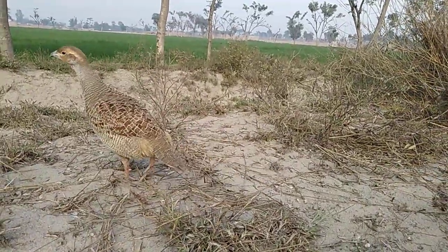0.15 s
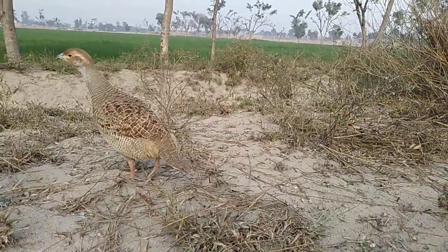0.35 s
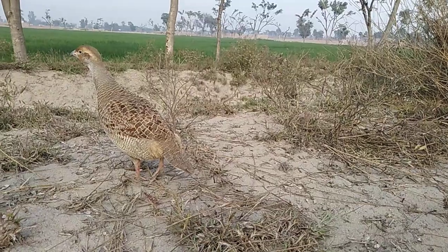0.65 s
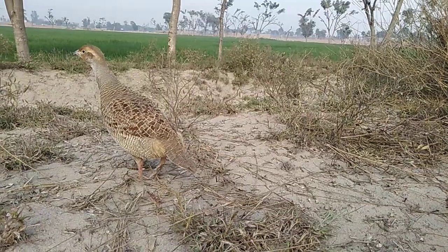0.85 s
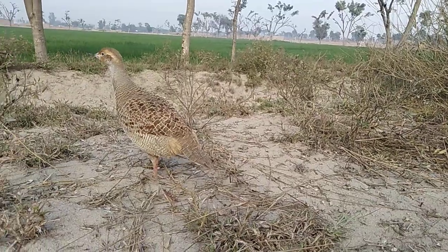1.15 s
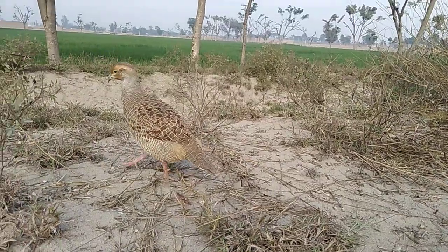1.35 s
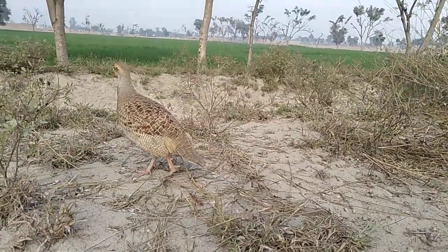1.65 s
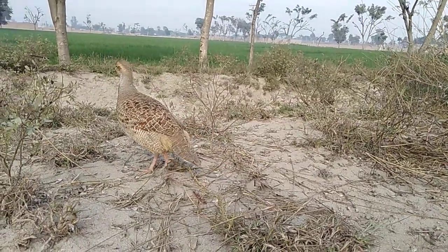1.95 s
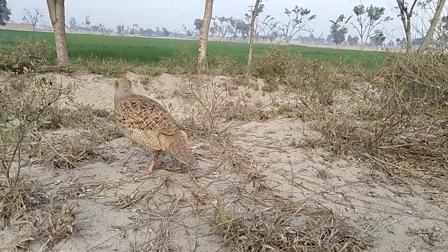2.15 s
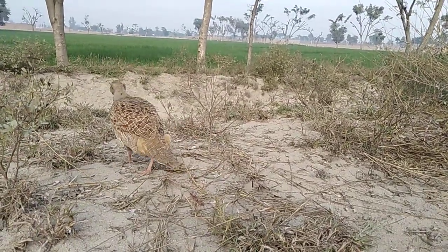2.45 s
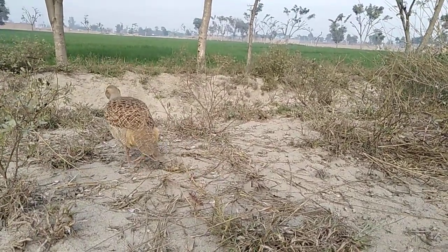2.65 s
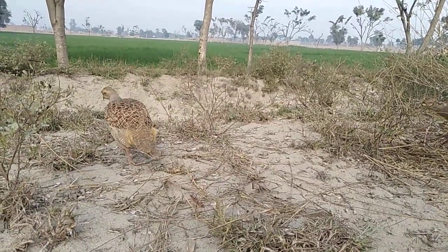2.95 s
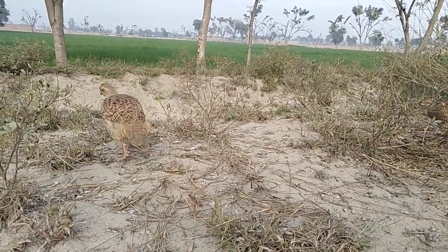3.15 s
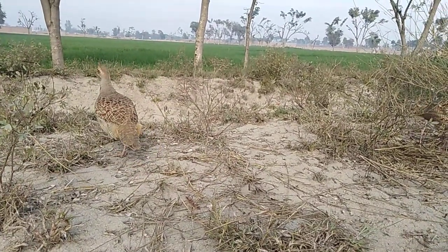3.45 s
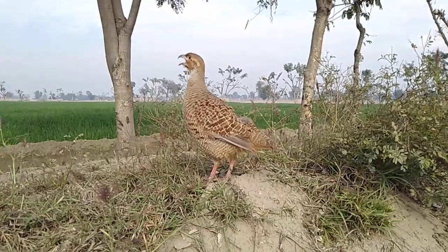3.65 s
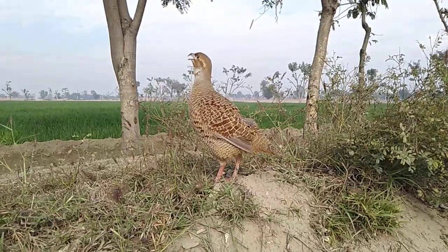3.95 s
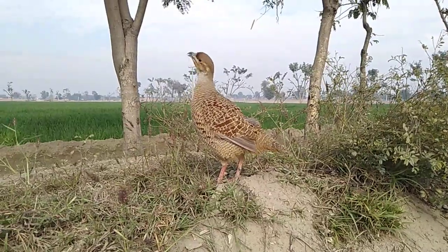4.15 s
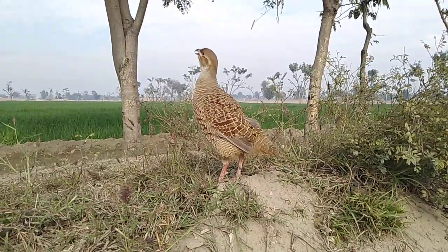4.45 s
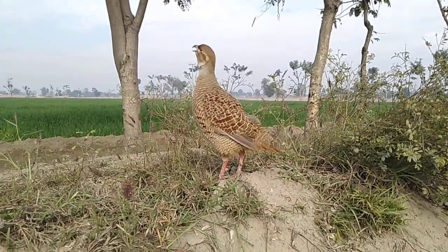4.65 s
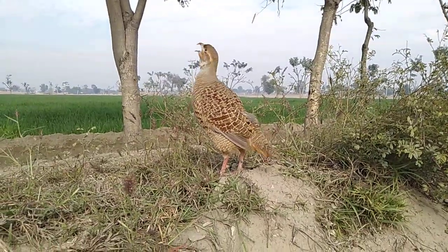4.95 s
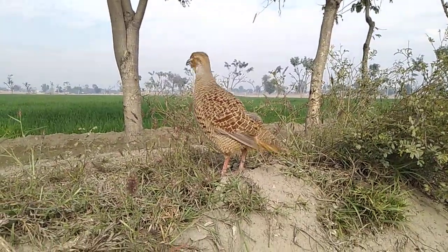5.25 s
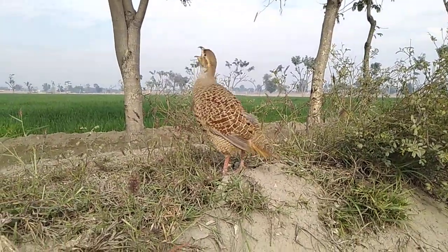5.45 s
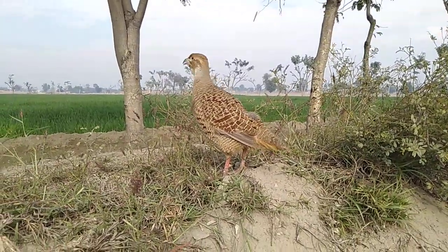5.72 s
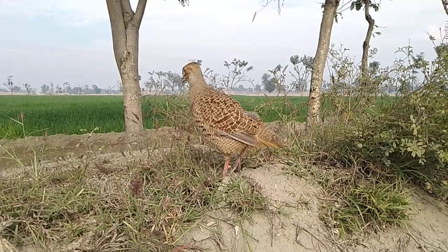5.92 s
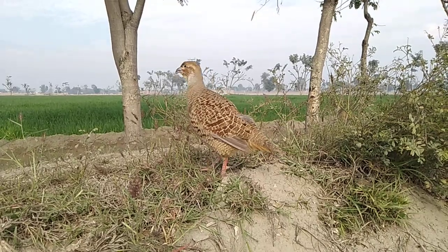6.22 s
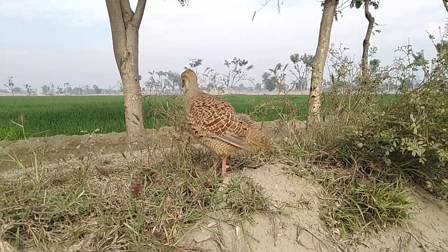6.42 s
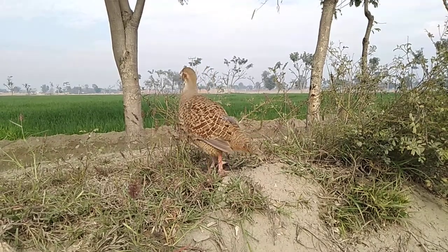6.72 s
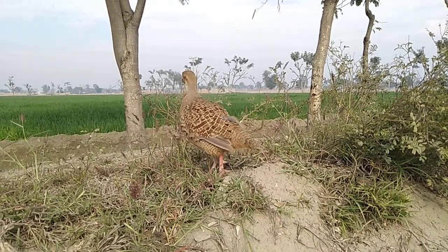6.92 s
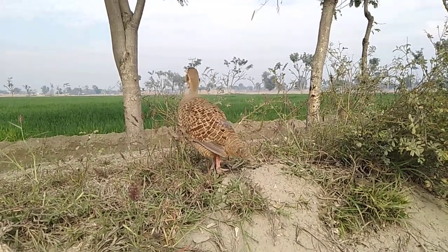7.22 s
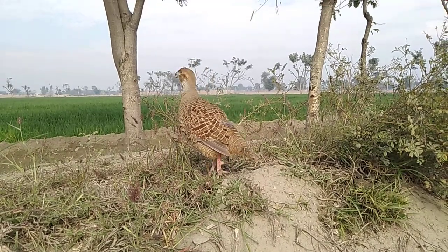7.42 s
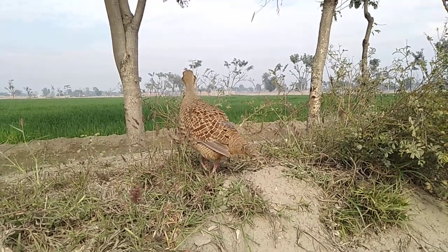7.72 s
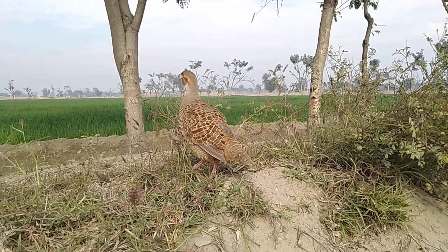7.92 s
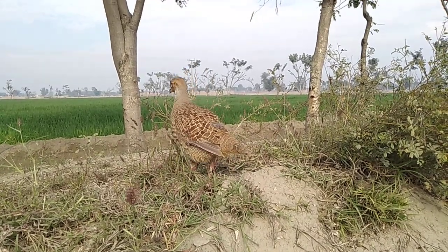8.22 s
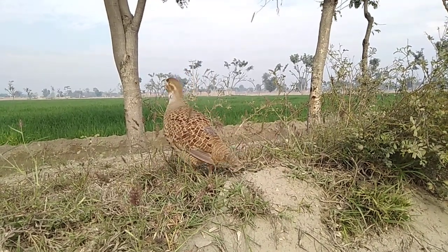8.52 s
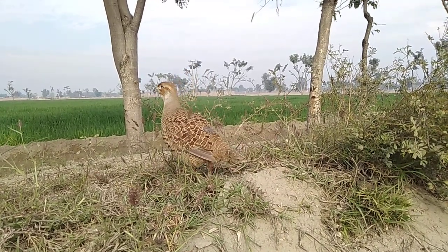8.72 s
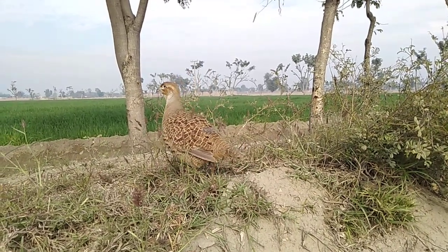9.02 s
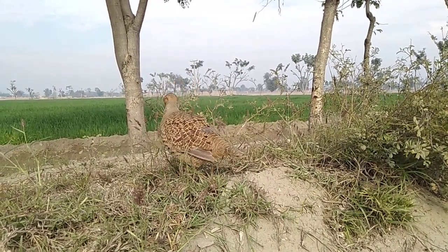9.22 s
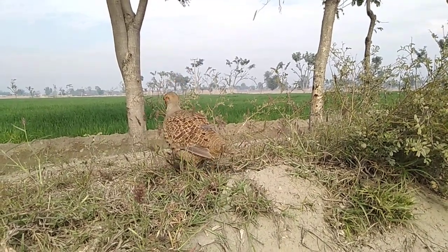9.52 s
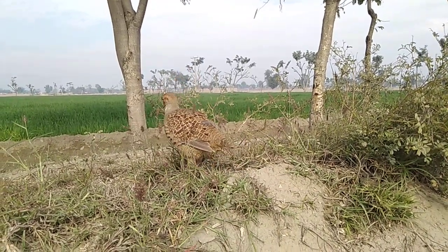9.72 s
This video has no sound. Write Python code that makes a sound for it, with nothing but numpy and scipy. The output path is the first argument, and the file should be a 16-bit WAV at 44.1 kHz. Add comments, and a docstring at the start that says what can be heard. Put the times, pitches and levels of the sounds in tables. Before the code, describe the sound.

A francolin calls close to the microphone at the edge of a field. It begins with three sharp, separate chips. After a short pause it gives nine quick, loud phrases, each made of clucks, a high whistle and a raspy yelp that slurs downward, and ends in fading clucks. Beneath are a quiet distant hum, a faint hiss, a few tiny grass ticks and very faint far birds.

```python
"""At the edge of a field, a grey francolin calls close by: three sharp chips, then a run of nine
phrases (two clucks, a whistle, a rasping yelp, a falling slur) that ends in fading clucks.
Its syrinx flips between clean tone and chaotic rasp; in clucks and chips its pulses ring the throat.
Ground and bushes scatter the calls; dry grass ticks and far birds call faintly over a low distant hum."""
import sys
import numpy as np
from scipy import signal
from scipy.fft import rfft, irfft, next_fast_len
from scipy.io import wavfile
from scipy.ndimage import uniform_filter1d, minimum_filter1d, map_coordinates

SR = 44100
rng = np.random.default_rng(int(sys.argv[2]) if len(sys.argv) > 2 else 0)


def unload_audio(sound):
    """Save the sound as a 16-bit wav file, at the path given as the first command line argument."""
    columns = np.transpose(np.atleast_2d(sound))
    # keep every value between -1 and 1, then stretch to whole-number steps
    steps = np.round(np.clip(columns, -1, 1) * 32767)
    wavfile.write(sys.argv[1], SR, steps.astype(np.int16))


N = 435266
TOP_HZ = 15900  # band limit
SLACK_HZ = 1052  # pitch of the slack syrinx, where squeaks start and held notes collapse

# Held notes: the tone scoops up from entry_hz, holds and sags, then collapses. Rasp is strong at the
# catch, faint in the hold (rasp_db), strong at the break, and fades over the release.
WHISTLE = dict(hz=2554, entry_hz=2091, sag_hz=0, db=-22.5, entry_db=-1, sag_db=.5,
               attack_s=.012, hold_s=.076, release_s=.02, collapse_s=.013,
               catch_db=-27, rasp_db=-52.5, break_db=-28.5, fade_db=28)
YELP = dict(hz=2619, entry_hz=2097, sag_hz=25, db=-16, entry_db=-6.5, sag_db=2.5,
            attack_s=.012, hold_s=.015, release_s=.039, collapse_s=.011,
            catch_db=-25.5, rasp_db=-40.5, break_db=-29.5, fade_db=8.5)
SLUR = dict(hz=1965, entry_hz=1760, sag_hz=324, db=-14.5, entry_db=-13.5, sag_db=4,
            attack_s=.0041, hold_s=.037, release_s=.017, collapse_s=.018,
            catch_db=-27, rasp_db=-50, break_db=-39, fade_db=16.5)
SLUR_LAG_S = .049  # from yelp to slur
# Base colour of each note, harmonics 2 and up: (level against the fundamental [dB])
WHISTLE_OVERTONES = [-6.5, -35.5, -26, -11, -6.5]
YELP_OVERTONES = [-5, -20.5, -32.5, -43.5, -34.5]
SLUR_OVERTONES = [-20, -25.5, -36.5, -42.5]
# Cues for the run: (whistle time [s], whistle gain [dB], yelp time [s], slur stretch [ratio])
PHRASES = [(3.676, -1.5, 3.815, 0.83), (4.219, -1, 4.377, .92), (4.78, -1, 4.935, 1.03),
           (5.345, 0, 5.497, 1.05), (5.932, 1, 6.108, 1.1), (6.526, 1.5, 6.684, 1.08),
           (7.111, 0.5, 7.287, 1.07), (7.719, 1.5, 7.912, .8), (8.329, 0.5, 8.533, .75)]


def phrases():
    """A rasping squeak leads into both whistle and yelp; the whistle lengthens along the run."""
    out = np.zeros(N)
    stretches = np.linspace(.96, 1.05, len(PHRASES))
    for (whistle_s, whistle_db, yelp_s, slur_stretch), stretch in zip(PHRASES, stretches):
        # a harder whistle has stronger top overtones
        overtones = WHISTLE_OVERTONES + .5 * (whistle_db - 4) * np.arange(len(WHISTLE_OVERTONES))
        add(out, *squeak(whistle_s, stretch=.85, db=-8.5))
        add(out, *held_note(whistle_s + .00047, WHISTLE, overtones, jitter=.038, split_db=-27.5,
                            stretch=stretch, db=whistle_db))
        add(out, *squeak(yelp_s, stretch=.95, db=.5))
        add(out, *held_note(yelp_s + .0011, YELP, YELP_OVERTONES, jitter=.1, split_db=-41.5))
        add(out, *held_note(yelp_s + SLUR_LAG_S, SLUR, SLUR_OVERTONES, jitter=.064, split_db=-44,
                            stretch=slur_stretch))
    return out


def held_note(s, kind, overtones, jitter, split_db, stretch=1, db=0):
    """A tone locks out of rasp at s, holds, and breaks back into rasp; returns (start [s], sound)."""
    lock_s, break_s = .0027, .0017
    attack, hold, release = kind["attack_s"], kind["hold_s"], kind["release_s"]
    t = np.arange(-attack, hold + release, 1 / (SR * stretch))
    loose, sag = ramp(-t, lock_s), ramp(t, hold)
    broken, dying = ramp(t - hold, break_s), ramp(t - hold, release)
    hz = kind["hz"] - kind["sag_hz"] * sag
    hz = hz + (kind["entry_hz"] - hz) * loose + (SLACK_HZ - hz) * ramp(t - hold, kind["collapse_s"])
    onset_db = db - 25 * ramp(-t, attack) ** 4
    tone_db = kind["db"] + kind["entry_db"] * loose - kind["sag_db"] * sag - 3 * broken - 28 * dying
    rasp_db = kind["rasp_db"] * (1 - loose - broken)
    rasp_db += kind["catch_db"] * loose + kind["break_db"] * broken
    rasp_db -= kind["fade_db"] * ramp(t - hold - break_s, release - break_s)
    edge_db = .5 - 11 * loose - 5 * broken  # overtones are strongest while locked
    sound = syrinx(hz, onset_db + tone_db, edge_db, onset_db + rasp_db, overtones, jitter, split_db)
    return s - attack * stretch, sound


# Base colour of the squeak, harmonics 2 and up: (level against the fundamental [dB])
SQUEAK_OVERTONES = [0.98, 0.39, -18.5]


def squeak(s, stretch, db):
    """Pitch arches up with tension and drops to a growl that ends at s; returns (start [s], sound)."""
    length_s, arch_s, top_hz = .053, .026, 1958
    t = np.arange(-.008, length_s + .004, 1 / (SR * stretch))
    tension = 1 - ramp(abs(2 * t - arch_s), arch_s) ** 3
    level_db = db + envelope(t, .0014, length_s - .006, attack_s=.011, release_s=.0083, sag_db=2)
    hz = (SLACK_HZ + (top_hz - SLACK_HZ) * tension) * (1 + .02 * wobble(len(t), 70))
    tone_db = level_db - 28.5 + 1.5 * tension
    edge_db = 5 * tension - 5.5
    rasp_db = level_db - 26 - 7 * tension ** 6  # the rasp clears at the top
    sound = syrinx(hz, tone_db, edge_db, rasp_db, SQUEAK_OVERTONES, jitter=.068)
    return s + (t[0] - length_s) * stretch, sound


# EQ of the rasp: (frequency [Hz], gain [dB])
RASP_EQ = [(300, -39.5), (700, -38), (1050, -3.5), (1450, -8.5), (2100, 2.5), (3100, 5), (4200, -11.5),
           (5300, 0), (6700, -10.5), (8300, -8.5), (11000, -23.5), (14500, -16), (16000, -24.5)]


def syrinx(hz, tone_db, edge_db, rasp_db, overtones, jitter, split_db=-44):
    """One gesture of the syrinx, which flips between a clean tone and a chaotic rasp."""
    size = len(hz)
    chaos = 1 / (1 + amp(tone_db - rasp_db) ** 2)  # the rasp's share of the power
    drift = .0034 * wobble(size, 30)
    shake = .03 * wobble(size, 150) + jitter * wobble(size, 1500)
    phase = turning(hz * (1 + drift + chaos * shake))
    voiced = tone(phase, overtones, amp(edge_db + .21 * wobble(size, 27)))
    rasp = noise(size, RASP_EQ) * (1 + .27 * np.cos(phase / 2))
    rasp *= amp(3.1 * wobble(size, 500))  # air escapes in uneven spurts
    # alternate cycles differ slightly: weak lines halfway between the harmonics
    halves = amp(split_db) * sum(wobble(size, 40) * np.sin((k + .5) * phase) for k in range(4))
    return amp(wobble(size, 90)) * (amp(tone_db) * (voiced + halves) + amp(rasp_db) * rasp)


# Cues for the clucks: (time [s], clucks [count], first level [dB], step per cluck [dB])
CLUCK_BOUTS = [(0.891, 1, -51.5, 0), (3.643, 1, -28.5, 0), (4.0, 2, -20, 0), (4.57, 2, -19.5, 0),
               (5.135, 2, -18.5, -1.5), (5.7, 2, -20, 0.1), (5.914, 1, -26.5, 0), (6.314, 2, -19, -2),
               (6.893, 2, -21.5, -1), (7.496, 2, -22, -0.4), (8.106, 2, -21, -1.85), (8.729, 3, -22, -6.5),
               (9.059, 1, -56, 0)]


def clucks(gap_s=.105):
    """Bouts of evenly spaced clucks, mostly a pair before each phrase."""
    out = np.zeros(N)
    for s, count, db, step_db in CLUCK_BOUTS:
        for k in range(count):
            add(out, s + k * gap_s, cluck(db + k * step_db))
    return out


# Throat resonances of a cluck: (centre [Hz], width [Hz], gain [dB])
CLUCK_THROAT = [(1390, 432, 28.5), (3030, 810, -28), (5900, 760, -33)]
# Base colour of its pure ending, harmonics 2 and up: (level against the fundamental [dB])
CLUCK_OVERTONES = [-22, -39.5, -27.5]


def cluck(db):
    """A rough buzz swells until the syrinx locks onto the throat resonance as a falling pure tone."""
    low_hz, arch_hz = 306.6, 188.1  # pulse rate at the ends, and its rise in the middle
    end_hz, sag_hz_per_s = 1350, 7000  # the pure tone
    length_s = .055 * amp(.2 * (db + 21))  # softer clucks are shorter
    pure_s = .027 * ramp(db + 23, 3)  # only a forceful cluck ends in a pure tone
    t = np.arange(int(1.2 * length_s * SR)) / SR
    size = len(t)
    swell_db = .5 + envelope(t, .35 * length_s, .95 * length_s, attack_s=.026, release_s=.016, sag_db=6)
    hz = low_hz + arch_hz * np.sin(np.pi * t / t[-1])
    hz *= 1 + .035 * wobble(size, 80) + .05 * wobble(size, 700)
    gate = np.minimum(ramp(t - length_s + pure_s, .002), ramp(length_s + .003 - t, .006))
    locked = np.sin(np.pi / 2 * gate) ** 2 * ramp(pure_s, .0087)  # a brief lock stays weak
    rough = (1 - .7 * locked) * (buzz(hz, CLUCK_THROAT, order=20) + amp(-21) * noise(size, RASP_EQ))
    pure_hz = end_hz + sag_hz_per_s * (length_s - t)
    pure_hz *= 1 + .012 * wobble(size, 48) + .0072 * wobble(size, 1300)
    clean = tone(turning(pure_hz), CLUCK_OVERTONES, amp(-4 + 4.6 * wobble(size, 88)))
    return amp(db) * (amp(swell_db) * rough + amp(2.5) * locked * clean)


def clipped_cluck(hz=1170):
    """The tail of a cluck cuts in abruptly and rings briefly."""
    t = np.arange(SR // 25) / SR
    return amp(-16.5) * np.cos(2 * np.pi * hz * t) / (1 + (t / .0098) ** 4)


# Beak resonances of a chip: (centre [Hz], width [Hz], gain [dB])
CHIP_BEAK = [(590, 810, -29.5), (1394, 400, -16.5), (4500, 430, -16.5), (6740, 1100, -20.5)]
# Cues for the chips: (time [s], level [dB], onset snap gain [dB])
CHIPS = [(0.93, -16.5, -3.5), (1.508, -16.5, -13), (2.122, -17.5, -0.5)]


def chips():
    """Sharp single notes: pulse rate arches while the throat resonance falls and the treble darkens."""
    out = np.zeros(N)
    full_s, end_s, release_s = .015, .058, .042
    t = np.arange(int((end_s + release_s) * SR)) / SR
    rate_hz = arch(t, top=645, at_s=.04, width_s=.06)
    throat_hz = arch(t, top=2280, at_s=.013, width_s=.087)
    crack = arch(t, top=.52, at_s=.042, width_s=.0059)  # the voice cracks at its highest
    level_db = envelope(t, full_s, end_s, attack_s=.024, release_s=release_s, sag_db=3) - 5 * crack
    dark_db = 7 * ramp(t - end_s, release_s)
    beak = [(centre, width, db - dark_db * (centre > throat_hz)) for centre, width, db in CHIP_BEAK]
    hiss_eq = [(1000, -13.5), (5700, -10.5), (6600, 0), (8500, -1.5), (11000, -19)]
    for s, db, snap_db in CHIPS:
        hz = rate_hz * (1 + .026 * wobble(len(t), 60) + .2 * (.15 + crack) * wobble(len(t), 900))
        voice = buzz(hz, [(throat_hz, 680, 0)] + beak)
        growl = amp(level_db / 2 - 22.5) * np.sin(turning(hz))  # the fundamental outlasts the overtones
        hiss = amp(level_db / 2 - 28.5 - dark_db) * noise(len(t), hiss_eq)
        snap = amp(snap_db - 8 - 60 * t / .07) * buzz(hz, [(6900, 1700, 7.5), (12400, 5500, -21.5)])
        add(out, s, amp(db) * (amp(level_db) * voice + growl + hiss + snap))
    return out


def buzz(hz, throat, order=36):
    """Syrinx pulses ringing the throat's steep resonances, at a steady rms of 1."""
    k = np.arange(1, order + 1)[:, None]
    f = k * uniform_filter1d(hz, size=64)
    gain = 0
    for i, (centre, width, db) in enumerate(throat):
        band = 1j * f * width / (centre ** 2 - f ** 2 + 1j * f * width)
        # alternating signs leave a deep valley between neighbouring resonances
        gain += (-1) ** i * amp(db) * band ** 2 * (f < TOP_HZ)
    power = uniform_filter1d(np.sum(abs(gain) ** 2, axis=0) / 2, size=400)
    return np.sum(gain * np.exp(1j * k * turning(hz)), axis=0).real / np.sqrt(power)


def murmur(low_hz=560, fall_hz=562, fall_s=.067):
    """A very soft bird note that falls and turns back up."""
    t = np.arange(SR // 7) / SR
    hz = low_hz + fall_hz * (1 - t / fall_s) ** 2
    hz *= 1 + .054 * wobble(len(t), 328)
    db = -60.5 + envelope(t, .025, .11, attack_s=.05, release_s=.03, sag_db=0)
    return amp(db) * tone(turning(hz), [-21])


# Reverb tail of the bushes: (frequency [Hz], time to fall 60 dB [s])
BUSH_DECAY = [(300, .2), (1700, 0.41), (5000, 0.53), (14000, 0.99)]


def outdoors(x, near_db, far_db):
    """Quick scatter from the ground, then a thin tail from bushes and trees."""
    hz, t, spectrum = signal.stft(rng.standard_normal(SR // 2), SR, nperseg=256)
    far = signal.istft(spectrum * amp(-60 * t / along(BUSH_DECAY, hz)[:, None]), SR, nperseg=256)[1]
    near = rng.standard_normal(len(far)) * amp(-60 * np.arange(len(far)) / SR / .11)
    impulse = amp(near_db) * near / np.linalg.norm(near) + amp(far_db) * far / np.linalg.norm(far)
    return signal.fftconvolve(x, np.pad(impulse, (SR // 300, 0)))[:N]


# Cues for the dry grass: (time [s], rough peak level [dB])
GRASS_TICKS = [(0.7749, -53), (1.4393, -54.5), (3.117, -55.5), (9.0679, -54.5)]


def grass():
    """Dry stalks tick and crackle briefly."""
    out, t = np.zeros(N), np.arange(SR // 12) / SR
    for s, db in GRASS_TICKS:
        crackle = noise(len(t), [(1000, -3), (8000, 2)]) * amp(2.6 * wobble(len(t), 400))
        add(out, s, amp(db - 7 - 60 * t / .09) * crackle)
    return out


# Cues for other birds: (time [s], length [s], first pitch [Hz], last pitch [Hz], level [dB])
FAR_NOTES = [(0.381, 0.67, 1286, 1300, -77), (2.354, .065, 562, 650, -71), (6.243, 0.047, 8800, 8700, -63),
             (7.46, .038, 3700, 2900, -67)]


def far_birds():
    """Thin faint notes from far off that swell, bend and fade."""
    out = np.zeros(N)
    for s, length, first_hz, last_hz, db in FAR_NOTES:
        progress = np.linspace(0, 1, int(length * SR))
        hz = first_hz + (last_hz - first_hz) * progress ** 2
        hz *= 1 + .0073 * wobble(len(hz), 120)
        add(out, s, amp(db) * np.sin(np.pi * progress) * tone(turning(hz), []))
    return out


# EQ of the distant hum and of the field hiss: (frequency [Hz], gain [dB])
HUM_EQ = [(12, -29.5), (20, 6), (70, 1), (173, -6.5), (307, -27.5), (400, -34), (520, -62), (880, -120)]
HISS_EQ = [(180, -36), (300, -3), (762, -2.5), (1010, -11), (1320, -3), (4300, -17), (9390, -21.5),
           (15000, -11), (16000, -27.5)]
# Fader moves of the ambience bed: (time [s], hum level [dB], hiss level [dB])
AMBIENCE_FADERS = [(0, -53, -67.5), (.85, -53, -67), (1.2, -57, -72.5), (2.3, -56, -72), (3.2, -53, -67),
                   (3.9, -56, -72), (8.9, -54, -68.5), (9.87, -50, -68.5)]


def field_ambience():
    """Low distant hum and the faint hiss of open fields."""
    t = np.arange(N) / SR
    times, hum_db, hiss_db = np.transpose(AMBIENCE_FADERS)
    hum = amp(np.interp(t, times, hum_db) + .46 * wobble(N, 4.2)) * noise(N, HUM_EQ)
    hiss = amp(np.interp(t, times, hiss_db) + .53 * wobble(N, 10)) * noise(N, HISS_EQ)
    return hum + hiss


def amp(db):
    """Decibels to gain."""
    return 10 ** (np.asarray(db) / 20)


def along(points, hz):
    """Read (frequency [Hz], value) points at hz, on a log axis."""
    f, values = np.transpose(points)
    return np.interp(np.log(hz + 1), np.log(f + 1), values)


def wobble(size, rate):
    """A smooth random curve, rate knots a second."""
    return map_coordinates(rng.standard_normal(int(size * rate / SR) + 4), [np.arange(size) * rate / SR])


def noise(size, eq):
    """Noise of rms 1, coloured by (frequency [Hz], gain [dB]) points."""
    padded = next_fast_len(size + 2048)
    gain = amp(along(eq, np.fft.rfftfreq(padded, 1 / SR)))
    x = irfft(rfft(rng.standard_normal(padded)) * gain, padded)[:size]
    return x / np.sqrt(np.mean(x ** 2) + 1e-20)


def add(out, s, x):
    """Mix x into out at time s."""
    i = round(s * SR)
    out[i:i + len(x)] += x[:len(out) - i]


def turning(hz):
    """Phase of a vibration at a moving pitch."""
    return 2 * np.pi * np.cumsum(hz) / SR


def tone(phase, overtones, edge=1):
    """A fundamental of rms 1 plus its overtones, which edge scales."""
    upper = sum(amp(db) * np.sin(k * phase) for k, db in enumerate(overtones, 2))
    return np.sqrt(2) * (np.sin(phase) + edge * upper)


def ramp(x, length):
    """0 up to x = 0, then rising to 1 at x = length."""
    return np.clip(x / length, 0, 1)


def arch(t, top, at_s, width_s):
    """A bell-shaped rise and fall."""
    return top * np.exp(-((t - at_s) / width_s) ** 2)


def envelope(t, start, end, attack_s, release_s, sag_db):
    """Level in dB: an attack up to start, a sagging hold until end, then a release."""
    outside = ramp(start - t, attack_s) + ramp(t - end, release_s)
    return -40 * outside ** 1.5 - sag_db * ramp(t - start, end - start)


def scene():
    """The chips sound dry over bare sand; the run is given among bushes."""
    run = phrases() + clucks()
    add(run, 3.579, clipped_cluck())
    opening = chips()
    add(opening, 2.79, murmur())
    scatter = outdoors(run, near_db=-17, far_db=-30) + outdoors(opening, near_db=-30, far_db=-46)
    return (run + opening + scatter + grass() + far_birds() + field_ambience())[None]


def record(dry):
    """A limiter holds the loudest peaks, which also bend slightly to one side; a band limit follows."""
    needed_gain = np.minimum(1, amp(-7) / (abs(dry) + 1e-9))
    limited = dry * uniform_filter1d(minimum_filter1d(needed_gain, size=130), size=130)
    bent = limited + .017 * limited ** 2
    padded = next_fast_len(N + SR // 2)
    passband = np.fft.rfftfreq(padded, 1 / SR) < TOP_HZ
    return irfft(rfft(bent, padded) * passband, padded)[..., :N]


dry = scene()
out = record(dry)
unload_audio(out)
```